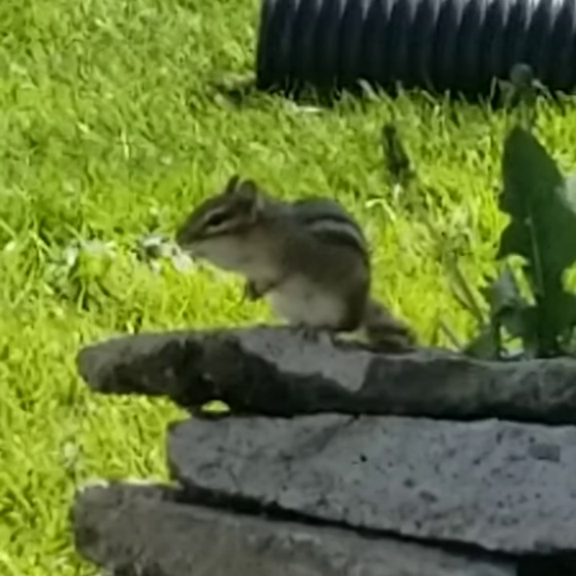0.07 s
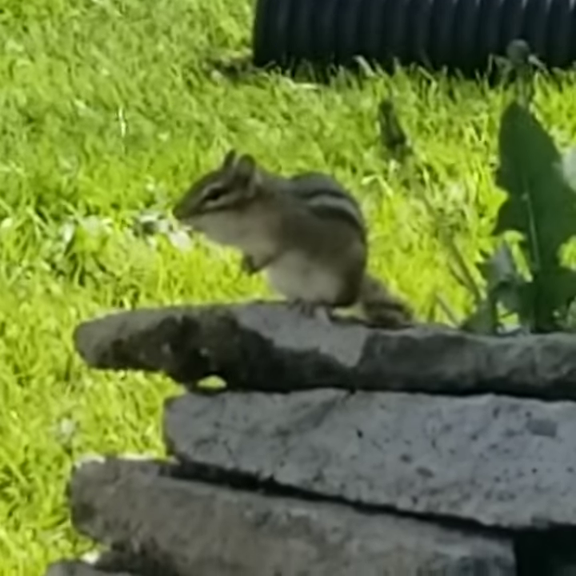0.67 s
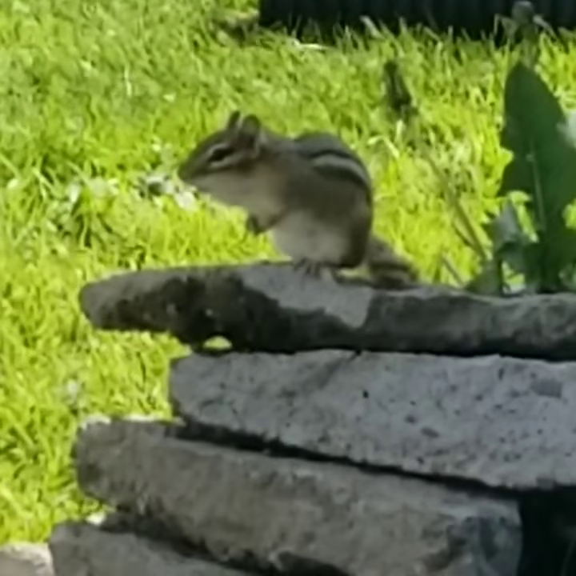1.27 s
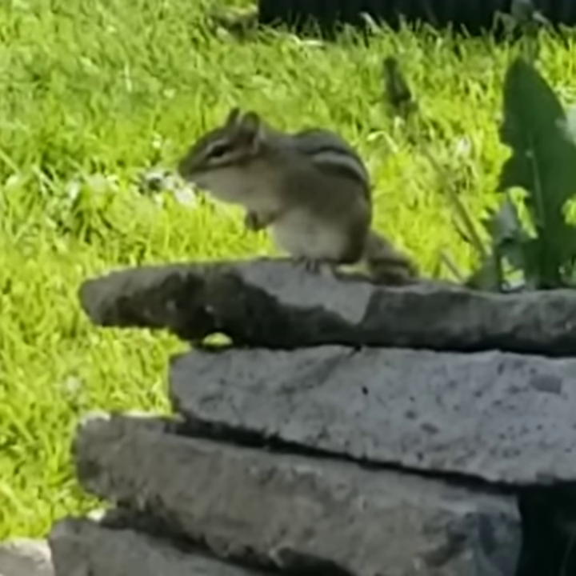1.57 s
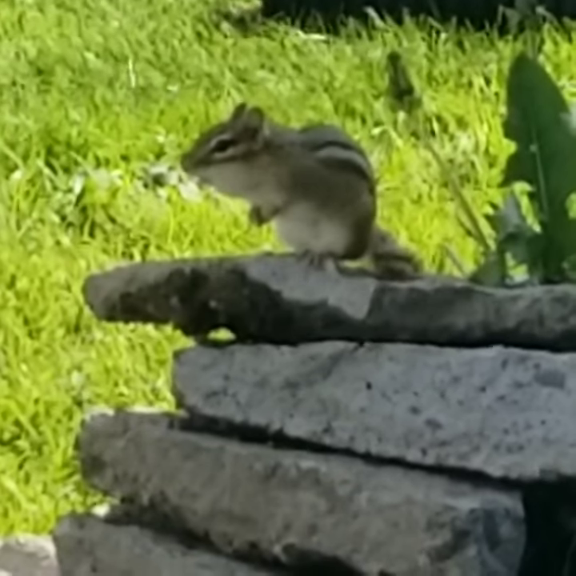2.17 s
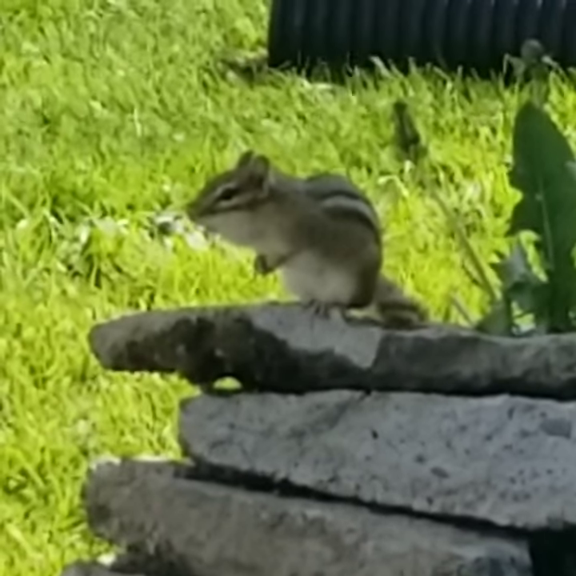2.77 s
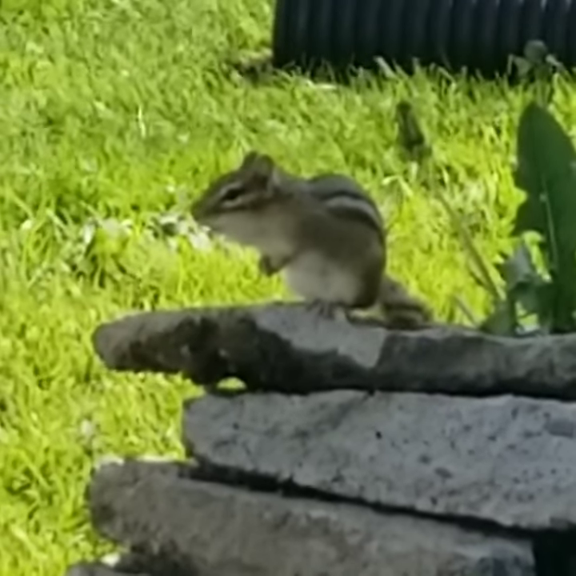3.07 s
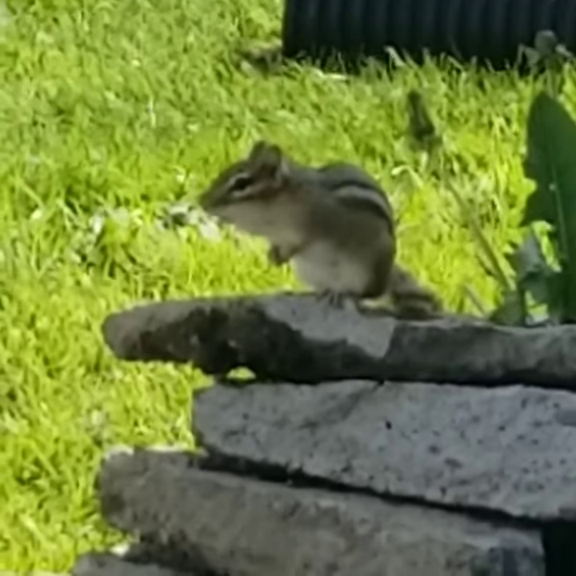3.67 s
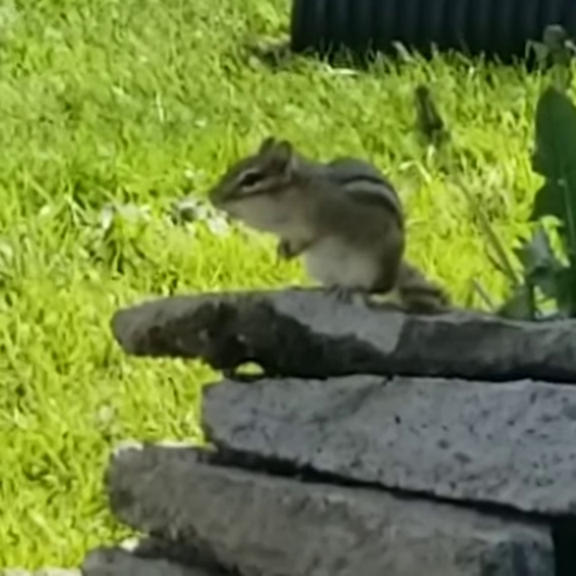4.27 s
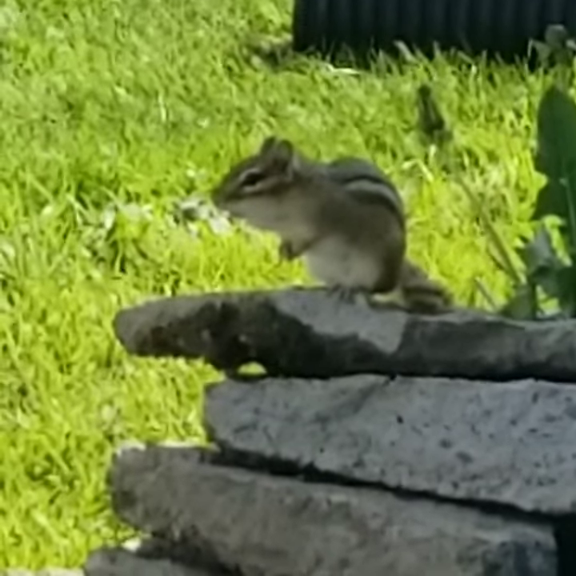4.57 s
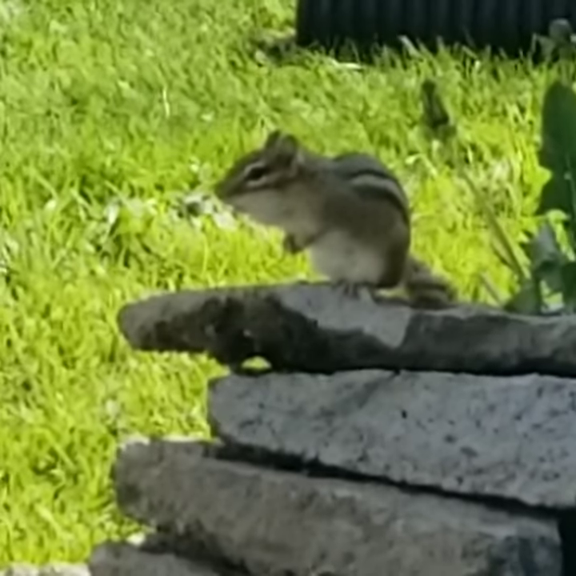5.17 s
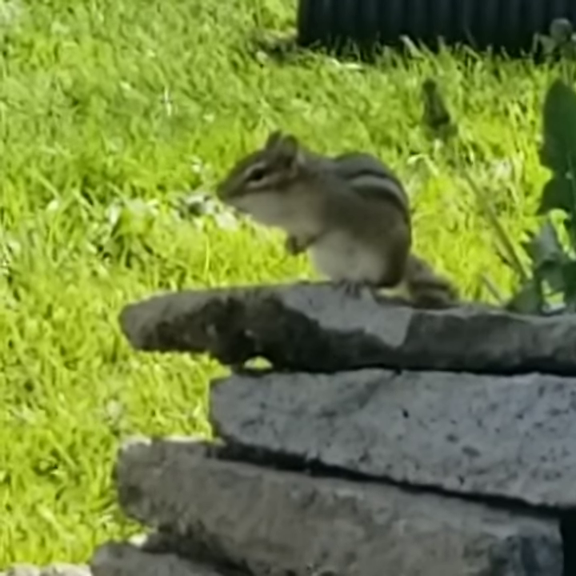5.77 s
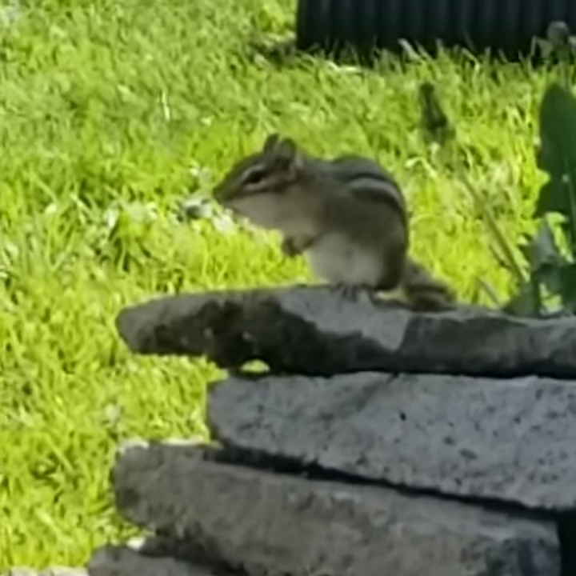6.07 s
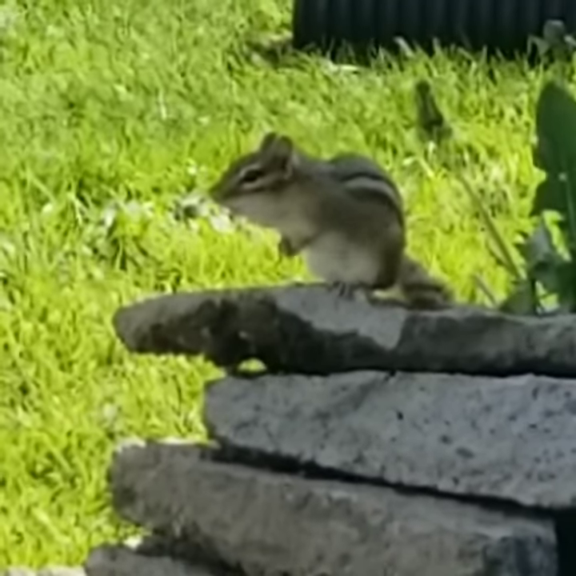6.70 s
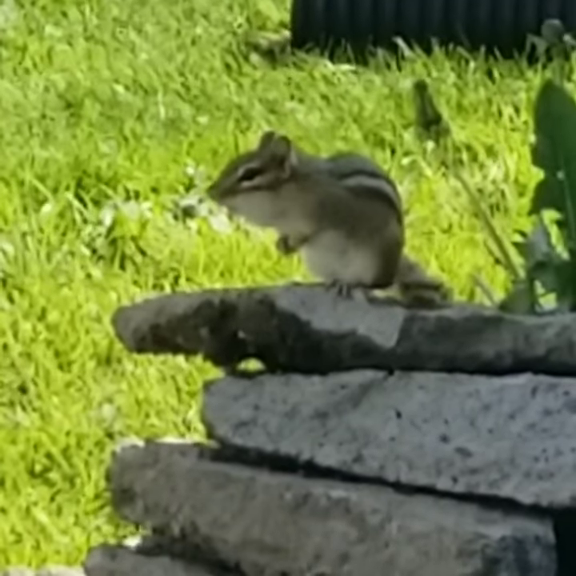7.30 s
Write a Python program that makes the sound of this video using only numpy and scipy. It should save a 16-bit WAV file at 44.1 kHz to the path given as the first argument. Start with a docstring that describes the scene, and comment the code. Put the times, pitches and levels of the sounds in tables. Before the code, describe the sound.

A chipmunk on a garden stone wall clucks about twice a second throughout, each call a short falling note with a slight echo. Quiet air and microphone hiss lie underneath, with soft rustles and a few dry ticks. About halfway, a hand scuffs and bumps the camera close to the stereo microphones. After that, faint birds call far away and a distant motor begins a low hum.

```python
"""A chipmunk on a garden wall clucks about twice a second, heard on a camera's stereo microphones.
Each cluck is a tiny falling squeak, then a short falling tone near 1 kHz; the stones and the yard
echo it. Far off, birds call over quiet air and a motor starts to hum; leaves rustle in between.
Right at the microphones, a hand scuffs and bumps the camera and a few dry ticks sound.
Both microphones hiss, and the left one is muffled in the treble."""
import sys
import numpy as np
from scipy import signal
from scipy.fft import rfft, irfft, next_fast_len
from scipy.io import wavfile
from scipy.ndimage import map_coordinates

SR = 44100
rng = np.random.default_rng(int(sys.argv[2]) if len(sys.argv) > 2 else 0)


def to_wav(sig):
    """Store sig (one row per channel, or 1-D mono) as 16-bit WAV at the path in sys.argv[1].

    Samples outside -1..1 are clipped; the rate is SR.
    """
    pcm = np.clip(np.atleast_2d(sig), -1, 1) * 32767
    pcm = np.round(pcm).astype(np.int16)
    wavfile.write(sys.argv[1], SR, pcm.T)  # frames by channels


N = 332514

# Hiss of each microphone, and an extra hiss on the right that stops early.
# Each row: frequency in Hz, level in dB per Hz.
LEFT_MIC_HISS = [(800, -115), (1800, -104), (2400, -94.5), (3200, -88), (3700, -93), (4300, -102),
                 (4900, -100), (5700, -110), (6500, -101.5), (7400, -106), (8500, -114), (10300, -119),
                 (13000, -113), (15800, -112)]
RIGHT_MIC_HISS = [(800, -115), (1800, -105), (3100, -102), (3800, -111), (5000, -114), (6100, -108),
                  (7200, -117), (8300, -112.5), (10000, -112), (13000, -114), (15800, -116)]
RIGHT_EXTRA_HISS = [(1600, -120), (2600, -97.5), (3400, -89.5), (4400, -101), (6200, -94.5), (7500, -98),
                    (9000, -104), (12000, -110), (15800, -118)]
# The left microphone's dull treble. Each row: frequency in Hz, gain in dB.
LEFT_MIC_RESPONSE = [(3500, 0.5), (5000, -2.5), (6200, -4), (7300, -11.5), (8500, -15.5), (11000, -13.5),
                     (15000, -13)]
# How alike the two microphones hear diffuse noise. Each row: frequency in Hz, correlation.
MIC_CORRELATION = [(50, 0.99), (150, 0.93), (300, 0.7), (1000, 0.094), (2000, 0.061)]
# The garden air's rumble and breeze. Each row: frequency in Hz, relative level in dB.
RUMBLE_SPECTRUM = [(13, -33), (22, 3.5), (32, 0), (43, 2), (65, 0.5), (81, -1.5), (146, -13), (185, -10),
                   (216, -18), (300, -30), (390, -26), (660, -120)]
BREEZE_SPECTRUM = [(120, -30), (200, -2), (292, -10), (372, -18.5), (649, -9.5), (707, -13), (769, -7),
                   (1000, -3.5), (1180, -9.5), (1520, -11.5), (1650, -16.5), (1900, -14), (2470, -26),
                   (4180, -120)]
# The course of a low murmur. Each row: time in seconds, level in dB.
MURMUR_LEVELS = [(0, -85), (2.5, -69), (3.2, -62.5), (3.9, -67.5), (4.9, -66), (5.6, -65.5), (6.3, -63.5),
                 (7.54, -70)]
# The yard's echo. Each row: frequency in Hz, t60 (time to fall 60 dB) in seconds.
YARD_DECAY = [(500, 0.11), (1000, 0.52), (4000, 0.27), (12000, 0.21)]
# Far birds. Each row: start and length in seconds, first and last pitch in Hz, level in dB.
BIRD_NOTES = [(4.654, 0.033, 8570, 8640, -47), (4.69, .12, 8580, 8730, -34), (5.8, .055, 2420, 2400, -61),
              (6.179, 0.059, 2435, 2466, -58.5), (6.327, 0.05, 2260, 2200, -62),
              (6.664, 0.23, 3104, 2620, -55.5), (6.862, 0.091, 2620, 2400, -50.5),
              (6.726, 0.097, 2510, 2230, -58), (7.336, .08, 2680, 2400, -59),
              (7.452, 0.037, 2320, 2430, -50)]
# Leaves and cloth. Each row: start and length in seconds, level in dB, centre in Hz, width in octaves.
SWISHES = [(1.877, 0.56, -59.5, 6900, 0.85), (2.138, 0.044, -44, 11140, 0.11),
           (2.654, 1, -59.5, 9000, 0.58), (2.699, .42, -60, 9700, .08), (2.807, 0.056, -52, 2970, 1),
           (2.953, .14, -58, 5630, .4), (3.02, .08, -56, 500, 0.094), (3.189, .25, -55.5, 6000, 0.52),
           (3.754, .045, -53.5, 4800, 0.48), (4.341, 0.064, -58.5, 4700, 0.91),
           (4.512, 0.12, -54, 5800, 0.89), (4.544, 0.052, -45.5, 9800, 0.16),
           (4.808, 0.32, -60, 5960, 0.85), (5.071, 0.083, -41.5, 8650, .12),
           (5.078, 1.0, -55.5, 10700, 0.78), (6.933, 0.26, -56, 5200, 0.34),
           (6.945, 0.23, -60.5, 9100, 0.58)]
# Dry snaps. Each row: start in seconds, level in dB, t60 in seconds, relative tail level in dB,
# centre in Hz, width in octaves, left over right in dB.
SNAPS = [(2.146, -34.5, 0.026, -11, 4110, 1.8, 1), (2.445, -49, 0.025, -20, 2920, 0.72, -11),
         (7.4318, -36, 0.0022, -38, 6500, 2, 14.5)]
# Fingers on the case. Each row: start in seconds, level in dB, rise and t60 in seconds,
# tilt in dB per octave.
FINGER_SCUFFS = [(1.96, -53, 0.054, 0.43, -2.5), (3.251, -53, 0.067, 0.52, -2.5),
                 (3.52, -49, 0.017, 0.39, -3), (4.013, -39.5, 0.017, 0.23, 1.2),
                 (4.089, -34.5, 0.011, 0.24, -1.5), (4.1, -36.5, 0.0093, 0.16, 0),
                 (4.156, -35, 0.0092, 0.37, -4), (4.175, -32, 0.012, 0.22, 0.4),
                 (5.076, -47, 0.011, 0.78, 0), (5.5, -50, .038, 0.3, -6), (6.019, -43.5, 0.025, 0.26, -3)]
# The colour of the rubbed case. Each row: frequency in Hz, relative level in dB.
CASE_SPECTRUM = [(120, -29), (200, -10), (534, -8.5), (850, -11.5), (1200, -10.5), (1800, -17.5),
                 (2300, -14), (2800, -14), (3700, -15.5), (4500, -17.5), (6200, -15), (7200, -23.5),
                 (8200, -18), (11000, -20), (13000, -25), (15000, -31), (15800, -40)]
# Dull bumps of the hand. Each row: start in seconds, peak in dB, pitch in Hz, rise and t60 in seconds.
HAND_BUMPS = [(2.22, -34, 40.8, .038, 0.18), (4.083, -25, 37.6, 0.0071, .3),
              (4.153, -16.5, 75.7, 0.044, 0.48), (4.236, -23.5, 51.1, 0.0066, 0.51),
              (6.034, -29, 46.3, 0.018, 0.42)]
# Harder knocks on the case. Each row: start in seconds, level in dB.
CASE_KNOCKS = [(3.325, -47), (4.014, -34.5), (4.152, -31.5)]
# Modes of the hollow case. Each row: frequency in Hz, relative level in dB, t60 in seconds.
CASE_MODES = [(126.5, -1.5, 0.47), (171.8, -1.5, 0.5), (285, -6.5, 0.16), (408, -14.5, 0.24),
              (474, -7.5, 0.27)]
# Paths from the chipmunk to each microphone, direct and off stones. Each row: delay in seconds, gain.
PATHS_TO_LEFT = [(0, 1), (.00589, .17), (.00991, .11), (.01461, .18), (.02284, .15), (.03369, .12),
                 (.03924, .11), (.04909, .05)]
PATHS_TO_RIGHT = [(.00004, .51), (.00133, .42), (.00678, .12), (.0113, .06), (.01831, .05), (.02479, .08),
                  (.02844, .11), (.04917, .05)]
# The squeak's two whistles. Each row: first and last pitch in Hz, relative peak in dB,
# time to the peak in seconds.
SQUEAK_WHISTLES = [(5060, 3740, -18, 0.0092), (10370, 6100, -18, 0.0099)]
# The chipmunk's calls. Each row: start of the tone in seconds, its level in dB.
CHIPMUNK_CLUCKS = [(0.3066, -23.5), (0.7933, -23.5), (1.3525, -22.5), (1.7338, -22.5), (2.101, -21.5),
                   (2.673, -21), (3.272, -21.5), (3.8424, -21), (4.243, -20.5), (4.7295, -24),
                   (5.148, -22.5), (5.5816, -22.5), (6.0337, -23), (6.4173, -24), (6.8776, -21),
                   (7.2725, -21)]


def amp(db):
    """Decibels to gain."""
    return 10 ** (np.asarray(db) / 20)


def unit(x):
    """x at rms 1."""
    return x / np.sqrt(np.mean(x ** 2) + 1e-20)


def along(points, hz):
    """Read (Hz, value) points on a log frequency axis."""
    freqs, values = np.transpose(points)
    return np.interp(np.log(hz + 1), np.log(freqs + 1), values)


def clock(seconds):
    """Sample times over a duration."""
    return np.arange(int(seconds * SR)) / SR


def wobble(rate, size):
    """A smooth random curve, rate knots a second."""
    knots = rng.standard_normal(int(size * rate / SR) + 4)
    return map_coordinates(knots, [np.arange(size) * rate / SR])


def phase(hz):
    """Running phase in radians of a changing pitch."""
    return 2 * np.pi * np.cumsum(hz, axis=-1) / SR


def filtered(x, response):
    """x through a frequency response."""
    size = x.shape[-1]
    padded = next_fast_len(size + 8192)
    return irfft(rfft(x, padded) * response(np.fft.rfftfreq(padded, 1 / SR)), padded)[..., :size]


def band(centre_hz, octaves):
    """A bell-shaped response on a log axis."""
    return lambda hz: np.exp(-.5 * (np.log2((hz + 1) / centre_hz) / octaves) ** 2)


def contour(points):
    """A response through (Hz, dB) points."""
    return lambda hz: amp(along(points, hz))


def noise(response, size):
    """Unrelated left and right noise of rms 1."""
    return unit(filtered(rng.standard_normal((2, size)), response))


def diffuse_noise(response, size):
    """Noise of rms 1 at the microphone pair, alike in the bass and unrelated in the treble."""
    def mid_and_side(hz):
        angle = np.arccos(np.clip(along(MIC_CORRELATION, hz), -1, 1)) / 2
        return response(hz) * np.array([np.cos(angle), np.sin(angle)])
    mid, side = noise(mid_and_side, size)
    return unit(np.array([mid + side, mid - side]))


def swell(t, rise, t60):
    """A soft rise, then an exponential decay."""
    return np.sin(np.pi / 2 * np.clip(t / rise, 0, 1)) * amp(-60 * np.maximum(t - rise, 0) / t60)


def add(track, start, x):
    """Mix x into track from start, in seconds."""
    part = track[..., max(round(start * SR), 0):][..., :x.shape[-1]]
    part += x[..., :part.shape[-1]]


def microphone_hiss(extra_ends_s=2.448):
    """Steady hiss of both microphones; the right one turns abruptly quieter."""
    tables = LEFT_MIC_HISS, RIGHT_MIC_HISS, RIGHT_EXTRA_HISS
    white = rng.standard_normal((3, N)) * np.sqrt(SR / 2)
    left, right, extra = filtered(white, lambda hz: amp([along(table, hz) for table in tables]))
    return np.array([left, right + extra * (np.arange(N) < extra_ends_s * SR)])


def garden_air(rumble_db=-50.5, breeze_db=-62.5, settle_s=.26, settle_from_db=-23):
    """All around: a steady low rumble, a soft breeze and a low murmur that comes and goes."""
    t = np.arange(N) / SR
    # The recorder's bass settles in during the first moment.
    settle_db = settle_from_db * np.maximum(1 - t / settle_s, 0)
    rumble = amp(rumble_db + settle_db + wobble(7.2, N)) * diffuse_noise(contour(RUMBLE_SPECTRUM), N)
    breeze = amp(breeze_db - .6 * wobble(3.05, N)) * diffuse_noise(contour(BREEZE_SPECTRUM), N)
    murmur_db = np.interp(t, *np.transpose(MURMUR_LEVELS)) + wobble(10, N)
    murmur = amp(murmur_db) * diffuse_noise(band(centre_hz=425, octaves=.83), N)
    return rumble + breeze + murmur


def distant_motor(hum_hz=132.1, level_db=-55.5, start_s=5.07, rise_s=.55):
    """A motor starts far away: one slightly wavering hum, the same in both microphones."""
    running = np.clip((np.arange(N) / SR - start_s) / rise_s, 0, 1)
    level = amp(level_db + wobble(6.5, N))
    pitch = hum_hz + .15 * wobble(2.91, N)
    return running * level * unit(np.sin(phase(pitch)))


def yard_echo(x):
    """The yard's diffuse stereo echo of a mono sound, lingering longest near 1 kHz."""
    hz, t, spectra = signal.stft(rng.standard_normal((2, SR // 2)), SR, nperseg=256)
    decay = amp(-60 * t / along(YARD_DECAY, hz)[:, None])
    tail = signal.istft(spectra * decay, SR, nperseg=256)[1]
    return signal.fftconvolve(x[None], tail / np.linalg.norm(tail[0]), axes=1)


def far_birds(waver_hz=40, waver_rate=300, swell_db=16):
    """Thin wavering whistles from far off, each swelling to its end, blurred by the yard."""
    out = np.zeros((2, N))
    for start, length, start_hz, end_hz, db in BIRD_NOTES:
        size = int(length * SR)
        pitch = np.geomspace(start_hz, end_hz, size) + waver_hz * wobble(waver_rate, size)
        shape = unit(signal.windows.tukey(size, .3) * amp(np.linspace(0, swell_db, size)))
        note = shape * np.sin(phase(pitch))
        echo = yard_echo(note)
        same_energy = np.linalg.norm(note) / np.linalg.norm(echo, axis=1, keepdims=True)
        add(out, start, amp(db) * same_energy * echo)
    return out


def rustles(grain_db=1.5, grain_rate=300, patchy_db=1.5, patch_rate=25, skew=.73):
    """Soft, grainy, uneven swishes, as of leaves and cloth, that rise faster than they fall."""
    out = np.zeros((2, N))
    for start, length, db, centre_hz, octaves in SWISHES:
        size = int(length * SR)
        catches = amp(grain_db * wobble(grain_rate, size) + patchy_db * wobble(patch_rate, size))
        swish = unit(noise(band(centre_hz, octaves), size) * catches)
        shape = np.sin(np.pi * np.linspace(0, 1, size) ** skew)
        add(out, start, amp(db) * swish * shape)
    return out


def ticks(tail_t60=.27):
    """Small dry snaps with a short bright tail, each from its own direction."""
    out, t = np.zeros((2, N)), clock(.55)
    for start, db, t60, tail_db, centre_hz, octaves, pan_db in SNAPS:
        shape = amp(-60 * t / t60) + amp(tail_db - 60 * t / tail_t60)
        pan = amp([[pan_db / 2], [-pan_db / 2]])
        add(out, start, amp(db) * pan * shape * noise(band(centre_hz, octaves), len(t)))
    return out


def finger_scuffs(grain_db=2, grain_rate=450):
    """Right by the microphones, fingers drag over the case in tiny slips that ring it."""
    out, t = np.zeros((2, N)), clock(.5)
    for start, db, rise, t60, tilt_db in FINGER_SCUFFS:
        colour = lambda hz: amp(along(CASE_SPECTRUM, hz) + tilt_db * np.log2(np.maximum(hz, 100)))
        slips = diffuse_noise(colour, len(t)) * amp(grain_db * wobble(grain_rate, len(t)))
        add(out, start, amp(db) * unit(slips) * swell(t, rise, t60))
    return out


def hand_bumps(waver=.061, waver_rate=62, shudder_db=-14, knock_rise_s=.024):
    """The hand shakes both microphones: soft bumps sway and shudder, knocks ring the hollow case."""
    out, t = np.zeros((2, N)), clock(.92)
    ring = lambda hz: np.sin(phase(hz * (1 + waver * wobble(waver_rate, len(t)))))
    for start, db, hz, rise, t60 in HAND_BUMPS:
        shudder = amp(shudder_db) * diffuse_noise(contour(RUMBLE_SPECTRUM), len(t))
        add(out, start, amp(db) * swell(t, rise, t60) * (ring(hz) + shudder))
    for start, db in CASE_KNOCKS:
        for hz, mode_db, t60 in CASE_MODES:
            add(out, start, amp(db + mode_db) * swell(t, knock_rise_s, t60) * ring(hz))
    return out


def stone_wall(voice):
    """The voice reaches each microphone directly and, moments later, off nearby stones."""
    def arrivals(paths, hz):
        return sum(gain * np.exp(-2j * np.pi * hz * delay) for delay, gain in paths)
    return filtered(voice, lambda hz: np.array([arrivals(PATHS_TO_LEFT, hz),
                                                arrivals(PATHS_TO_RIGHT, hz)]))


def cluck_squeak(length_s=.016, rise_db_per_s=2498, fall_db_per_s=3000,
                 roughness=.036, rough_rate=1500, rasp_db=-11, third_db=-15, scatter_db=1):
    """Two faint, rough whistles slide down, each swelling to a peak and dying, with a trace of rasp."""
    t = clock(length_s)
    start_hz, end_hz, peak_db, peak_s = np.transpose(SQUEAK_WHISTLES)[..., None]
    slide_hz = start_hz + (end_hz - start_hz) * t / length_s
    lower_phase, upper_phase = phase(slide_hz * (1 + roughness * wobble(rough_rate, len(t))))
    below_peak_db = np.maximum((peak_s - t) * rise_db_per_s, (t - peak_s) * fall_db_per_s)
    lower_level, upper_level = amp(peak_db - below_peak_db)
    rasp = amp(rasp_db) * noise(band(centre_hz=9000, octaves=1), len(t))[0]
    lower = lower_level * (np.sin(lower_phase) + amp(third_db) * np.sin(3 * lower_phase) + rasp)
    upper = upper_level * np.sin(upper_phase)
    return amp(scatter_db * rng.normal()) * (lower + upper)


def cluck_tone(start_hz=1206, end_hz=670, glide_s=.018, rise_s=.0042, hold_s=.0099, t60=.041,
               octave_gain=.071, scatter=.0067):
    """A nearly pure tone that sags in pitch and dies fast; its octave shows only at the start."""
    t = clock(.045)
    detune = 1 + scatter * rng.normal()
    effort = np.exp(-t / glide_s)
    angle = phase(detune * (end_hz + (start_hz - end_hz) * effort))
    attack = np.sin(np.pi / 2 * np.clip(t / rise_s, 0, 1)) ** 2
    decay = amp(-60 * np.maximum(t - hold_s, 0) / t60)
    octave = octave_gain * effort ** 3 * np.sin(2 * angle)
    return attack * decay * (np.sin(angle) + octave)


def chipmunk(squeak_lead_s=.0172, squeak_gain_db=-21.5, tone_echo_db=-20, squeak_echo_db=-4):
    """From the wall, each cluck is a squeak and then a tone, both echoed by the stones and the yard."""
    voice, echo = np.zeros(N), np.zeros((2, N))
    for start, db in CHIPMUNK_CLUCKS:
        tone = amp(db) * cluck_tone()
        squeak = amp(squeak_gain_db) * cluck_squeak()
        add(voice, start, tone)
        add(voice, start - squeak_lead_s, squeak)
        add(echo, start, amp(tone_echo_db) * yard_echo(tone))
        add(echo, start - squeak_lead_s, amp(squeak_echo_db) * yard_echo(squeak))
    return stone_wall(voice) + echo


def scene():
    """The garden at the two microphones: the left one is muffled, and both add their own hiss."""
    garden = chipmunk() + far_birds() + rustles()
    close_by = finger_scuffs() + hand_bumps() + ticks()
    background = garden_air() + distant_motor()
    left, right = background + close_by + garden
    muffled_left = filtered(left, contour(LEFT_MIC_RESPONSE))
    return np.array([muffled_left, right]) + microphone_hiss()


def record(dry):
    """The camera opens its input after a moment and keeps nothing above its band limit."""
    opens_s, top_hz = .071, 15800
    return filtered(dry * (np.arange(N) > opens_s * SR), lambda hz: hz < top_hz)


dry = scene()
out = record(dry)
to_wav(out)
```